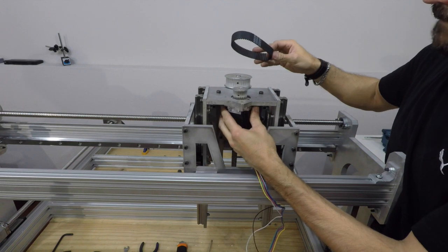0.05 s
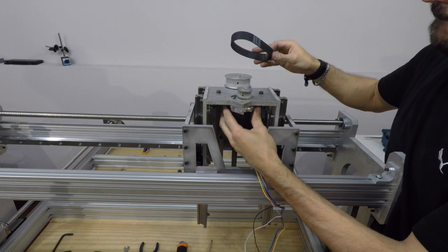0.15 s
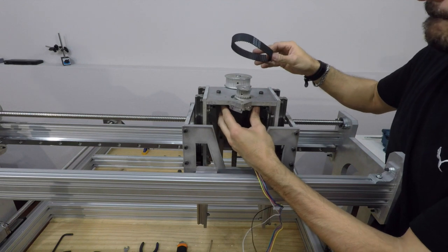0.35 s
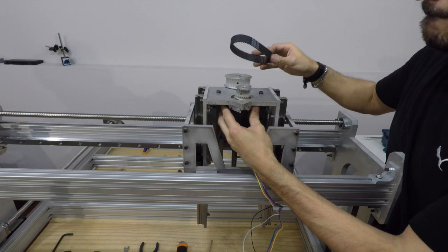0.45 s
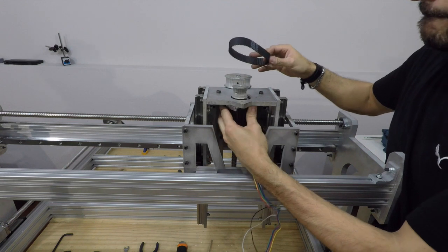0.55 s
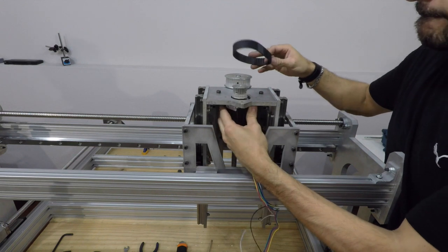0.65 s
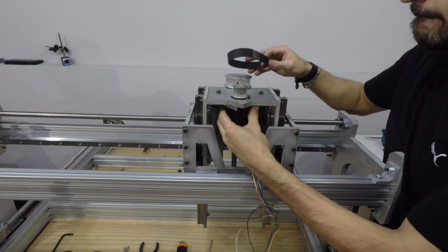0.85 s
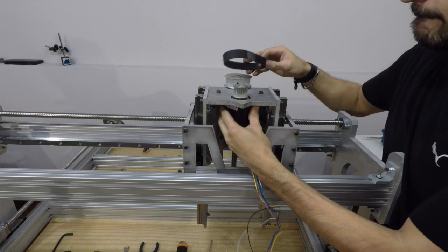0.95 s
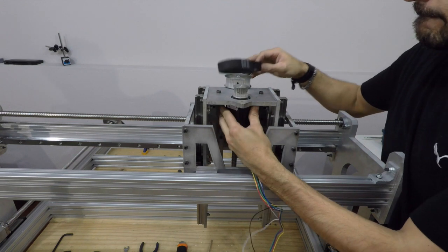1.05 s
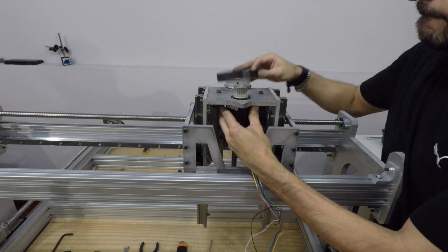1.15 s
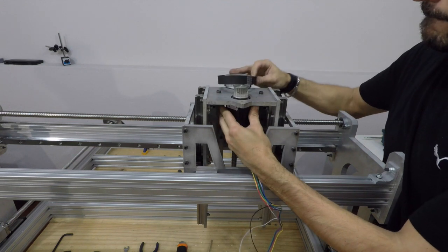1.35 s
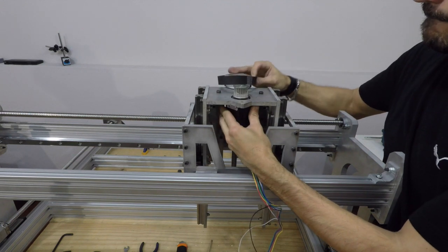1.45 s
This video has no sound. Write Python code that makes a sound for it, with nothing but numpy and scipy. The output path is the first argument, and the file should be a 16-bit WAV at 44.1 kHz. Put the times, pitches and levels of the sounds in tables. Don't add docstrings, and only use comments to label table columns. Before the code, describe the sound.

Metal frame knocked five times about a fifth of a second apart, each clank quickly damped, with low bench thuds, tiny ticks and faint belt rubs at the end; close microphone, reverberant room, low rumble.

```python
import sys
import numpy as np
from scipy import signal
from scipy.fft import rfft, irfft, next_fast_len
from scipy.io import wavfile
from scipy.ndimage import map_coordinates

SR = 44100
rng = np.random.default_rng(int(sys.argv[2]) if len(sys.argv) > 2 else 0)


def natural_amplitude(level_db):
    exponent = np.asarray(level_db, float) / 20
    return 10 ** exponent


def inscribe(sig):
    pcm = np.round(np.clip(np.atleast_2d(sig).T, -1, 1) * 32767)
    wavfile.write(sys.argv[1], SR, pcm.astype(np.int16))


N = 66150
T = np.arange(int(0.7 * SR)) / SR
ROOM_BUILD_S = 0.013
BENCH_WAVER_RATE = 18.9


def unit(x):
    return x / np.sqrt(np.mean(x ** 2) + 1e-20)


def along(points, hz):
    f, v = np.transpose(points)
    return np.interp(np.log(hz + 1), np.log(f + 1), v)


def coloured(spectrum, count):
    m = next_fast_len(count + 8192)
    gain = natural_amplitude(along(spectrum, np.fft.rfftfreq(m, 1 / SR)))
    return unit(irfft(rfft(rng.standard_normal(m)) * gain, m)[:count])


def waver(depth, rate):
    return depth * map_coordinates(rng.standard_normal(200), [T * np.clip(rate, 1, 250)])


def onset(attack_s):
    return 1 - np.exp(-T / attack_s)


def add(x, s, sound):
    part = x[round(s * SR):][:len(sound)]
    part += sound[:len(part)]


# (frequency [Hz], t60 [s])
ROOM = [(100, 0.76), (400, 0.44), (1200, 0.48), (3000, 0.48), (8000, 0.19)]


def reverberant(x):
    hz, t, z = signal.stft(x, SR, nperseg=256)
    decay = natural_amplitude(-60 * t / along(ROOM, hz)[:, None])
    shape = (1 - np.exp(-t / ROOM_BUILD_S)) * decay
    return signal.istft(z * shape, SR, nperseg=256)[1][:len(x)]


# (frequency [Hz], density [dB per Hz])
CRACK = [(500, -57), (1100, 8.5), (2000, -4), (4500, -11), (6000, -20), (15000, -57)]


def ring(modes, crack_db, free_s, damped_s, softness=1):
    tones = 0
    for hz, t60, db in modes:
        phase = 2 * np.pi * (hz * T + rng.random()) + waver(1.3, hz / 18)
        tones = tones + natural_amplitude(db - 60 * T / t60) * np.sin(phase)
    damping = natural_amplitude(-60 * np.maximum(T - free_s, 0) / damped_s)
    crack = natural_amplitude(crack_db - 60 * T / 0.051) * coloured(CRACK, len(T))
    return (tones * damping + crack) * onset(softness * 0.00077)


def boom(modes, swell_s, hold_s):
    t = np.maximum(T - 0.00591, 0)
    out = 0
    for hz, t60, db in modes:
        phase = 2 * np.pi * (hz * t + rng.random()) + waver(1, BENCH_WAVER_RATE)
        out = out + natural_amplitude(db - 60 * np.maximum(t - hold_s, 0) / t60) * np.sin(phase)
    return out * (1 - np.exp(-t / swell_s))


# (time [s], ring level [dB], room level [dB], boom level [dB], boom swell [s])
KNOCKS = [
    (0.1656, -21.5, -34.5, -37, 0.0074),
    (0.3546, -32, -37.5, -39.5, 0.0074),
    (0.5606, -33, -36.5, -36.5, 0.031),
    (0.7844, -38.5, -42.5, -42, 0.0047),
    (1.0146, -32, -38, -42, 0.0075),
]
# (crack over ring [dB], time until damped [s], damping t60 [s], boom hold [s])
CONTACTS = [
    (-21, 0.014, 0.034, 0.063),
    (-7, 0.0091, 0.21, 0.062),
    (-3.5, 0.0095, 0.097, 0.062),
    (-2, .01, 0.11, 0.034),
    (0.5, 0.0062, 0.32, 0.026),
]
SOFTNESS = 1.4, 1.2, 0.87, 0.77, 2.75
WET_DB = 1.5, -2, 2.5, -2.5, -4.5
# (time [s], knock number from 0 [1], level over that knock [dB])
REBOUNDS = [
    (0.586, 2, 0),
]
# (frequency [Hz], t60 [s], level [dB])
RING_1 = [(1491, 0.095, -3), (1630, 0.12, -7.5), (2028, 0.085, -12), (2240, 0.45, -28), (3054, 0.17, -27),
          (3830, 0.083, -17), (4920, 0.034, -18), (5020, 0.043, -16), (7300, 0.037, -27), (9650, 0.05, -32)]
RING_2 = [(1245, 0.11, -0.5), (1467, 0.37, -5), (1973, 0.09, -3), (2720, 0.054, -20), (3320, 0.053, -10.5),
          (3890, 0.053, -11), (5120, 0.056, -8.5), (8100, 0.039, -23)]
RING_3 = [(1206, 0.13, -3.5), (1538, 0.44, -8), (1613, 0.063, 1), (1990, 0.11, -7.5), (2790, 0.05, -6.5),
          (2920, 0.12, -7.5), (3270, 0.3, -13.5), (3850, 0.018, -3), (5090, 0.12, -14), (6830, 0.036, -21),
          (14800, 0.12, -36)]
RING_4 = [(1016, 0.12, 2.5), (1337, 0.056, -3.5), (1603, 0.059, -0.5), (1970, 0.095, -5), (2765, 0.064, -7),
          (768, 0.088, -8)]
RING_5 = [(890, 0.11, -9), (1114, 0.66, 1.5), (1250, 0.22, -7.5), (1268, 0.52, -3), (1460, 0.078, -7.5),
          (2071, 0.069, 5), (2586, 0.059, -13.5), (5300, 0.049, -20)]
# (frequency [Hz], t60 [s], level
# [dB])
BOOM_1 = [(32.7, 1, -2.5), (72.6, 0.31, 10.5), (109.1, 0.59, 8.5), (144.4, 0.26, 0.5), (241.3, 0.23, 1.5),
          (280.6, 0.15, 5), (411.3, 0.36, 2.5), (505, 0.21, 0.5)]
BOOM_2 = [(31.4, 1, -1), (70.8, 0.73, 2.5), (106.8, 0.25, 3), (152.4, 0.35, -5.5), (253.5, 0.44, 2.5),
          (347, 0.6, -4.5), (403.7, 0.17, -0.5), (489, 0.19, -4)]
BOOM_3 = [(66.2, 0.38, -6), (107.3, 0.37, 2.5), (141.8, 0.38, -2), (261, 0.26, 3), (329.6, 0.35, -2),
          (425, 0.8, -9.5), (521.5, 0.079, 4.5), (583, 0.077, -2), (691, 0.064, -3.5), (1864, 0.53, -9.5),
          (1990, 0.48, -13)]
BOOM_4 = [(68.9, 0.52, 1), (264.4, 0.44, -16), (362, 0.66, -7), (400.2, 0.27, 0), (453, 0.14, 2),
          (516, 0.075, -1), (544, 0.12, -5.5)]
BOOM_5 = [(73.4, 0.6, -1), (115.3, 0.4, 0), (255, 0.61, -3), (320.4, 0.18, 4), (423, 0.21, 2),
          (456, 0.18, 3), (519.4, 0.21, 5), (573, 0.2, 2.5), (676, 0.071, 1.5), (764, 0.17, -7)]
# (frequency [Hz], density [dB per Hz])
CLATTER_1 = [(150, -29), (250, 0), (750, -11.5), (1500, -9), (2300, -15.5), (2800, -22.5), (5500, -33.5),
             (14000, -53)]
CLATTER_2 = [(150, -44), (250, -0.5), (700, -6), (1300, -10.5), (2100, -21), (3300, -26.5), (5500, -36),
             (14000, -50)]
CLATTER_3 = [(150, -12), (250, -1), (700, -1), (1300, -6.5), (2100, -17), (3300, -19.5), (5500, -26.5),
             (14000, -53)]
CLATTER_4 = [(150, -23), (300, 2.5), (700, -8), (1300, -7), (2100, -41), (3300, -30), (5500, -48),
             (14000, -81)]
CLATTER_5 = [(150, -30), (300, 0.5), (700, -3), (1300, -3), (2300, -24), (3700, -24), (5000, -38),
             (14000, -90)]


def knocks():
    out = np.zeros(N)
    rings = RING_1, RING_2, RING_3, RING_4, RING_5
    booms = BOOM_1, BOOM_2, BOOM_3, BOOM_4, BOOM_5
    clatters = CLATTER_1, CLATTER_2, CLATTER_3, CLATTER_4, CLATTER_5
    for k, (s, ring_db, room_db, boom_db, swell_s) in enumerate(KNOCKS):
        *contact, hold_s = CONTACTS[k]
        direct = ring(rings[k], *contact, SOFTNESS[k])
        tail = reverberant(rng.standard_normal(len(T)))
        echo = signal.fftconvolve(direct, tail / np.linalg.norm(tail))[:len(T)]
        add(out, s, natural_amplitude(ring_db) * (direct + natural_amplitude(-7 + WET_DB[k]) * echo))
        add(out, s, natural_amplitude(boom_db) * boom(booms[k], swell_s, hold_s))
        add(out, s, natural_amplitude(room_db + 6) * reverberant(coloured(clatters[k], len(T))))
    for s, number, db in REBOUNDS:
        k = round(number)
        crack_db = -23
        add(out, s, natural_amplitude(KNOCKS[k][1] + db) * ring(rings[k], crack_db, *CONTACTS[k][1:3]))
    return out


# (frequency [Hz], t60 [s], level [dB])
RATTLE = [(1440, 0.074, -47), (2300, 0.049, -14), (3710, 0.057, 1.5), (4300, .04, -3.5), (4700, 0.028, -12),
          (7100, 0.043, -21), (9400, 0.051, -22)]


def rattle():
    out = np.zeros(N)
    direct = natural_amplitude(-36) * ring(RATTLE, crack_db=-2, free_s=0.012, damped_s=0.03)
    room = natural_amplitude(-27.5) * reverberant(coloured(CLATTER_2, len(T)))
    add(out, 0.2055, direct + room)
    return out


# (time [s], ..)
TICK_S = [
    (.168, .175, .176, .177, .199, .2045, .207, .212, .215, .222, .226, .226, .232, .252, .262),
    (.356, .358, .374, .376, .378, .398, .438, .53),
    (.5625, .5625, .563, .5625, .572, .583, .593, .604, .621, .634),
    (.785, .787, .798, .806, .824),
    (1.021, 1.028, 1.048, 1.054, 1.061, 1.068, 1.072, 1.098, 1.105, 1.117, 1.138, 1.241),
]
# (frequency [Hz], t60 [s], level [dB])
TICKS = [
    [(2970, 0.2, -42), (152, 0.092, -27.5), (263, 0.067, -30), (107, 0.075, -29.5), (1825.2, .03, -37),
     (3990, 0.032, -38), (1270, 0.032, -37), (857, 0.06, -30), (3530, .02, -38), (1010, 0.034, -36),
     (1495, 0.035, -36), (305, 0.056, -36), (2370, 0.033, -35), (1513, 0.062, -35), (1090, 0.037, -41)],
    [(1157, 0.055, -38), (3030, .05, -46), (3060, 0.036, -48), (2020, 0.065, -36), (1280, 0.035, -42),
     (438, .05, -35), (3200, 0.066, -53), (444, 0.12, -42)],
    [(3100, .025, -37), (3940, 0.029, -33), (2700, .025, -35), (1600, .03, -32), (3060, .08, -40.5),
     (1934, 0.086, -33.5), (2900, 0.021, -51), (630, .04, -37), (558, 0.072, -33), (333, .08, -37)],
    [(3900, 0.036, -46), (630, .04, -39), (1220, .03, -41), (437, 0.062, -36), (420, 0.054, -36)],
    [(614, 0.085, -32), (1150, 0.071, -24), (604, .05, -36), (2090, 0.043, -38), (464, 0.056, -34),
     (1200, 0.055, -34), (2020, 0.046, -37), (1290, .1, -38), (194, 0.059, -45), (2020, .04, -45),
     (1267, 0.049, -44), (1230, 0.11, -51)],
]


def ticks():
    out = np.zeros(N)
    for times, modes in zip(TICK_S, TICKS):
        for s, (hz, t60, db) in zip(times, modes):
            add(out, s, natural_amplitude(db - 60 * T / t60) * np.sin(2 * np.pi * hz * T) * onset(0.0011))
    return out


# (knock number from 0 [1], frequency [Hz], t60 [s], level [dB])
LINGER = [(4, 1500, 0.49, -47), (4, 1300, 0.61, -42), (4, 1200, .55, -41), (4, 1700, .7, -54.5),
          (4, 790, 0.35, -45), (0, 2326, 0.48, -40.5), (0, 2213, .33, -55), (0, 1077, 0.55, -43),
          (4, 1400, 0.26, -48)]


def lingering():
    out = np.zeros(N)
    for k, hz, t60, db in LINGER:
        flutter_db = waver(4.5, 25.6)
        level = natural_amplitude(db - 60 * T / t60 + flutter_db) * onset(ROOM_BUILD_S)
        phase = 2 * np.pi * hz * T + waver(0.36, BENCH_WAVER_RATE)
        add(out, KNOCKS[round(k)][0], level * np.sin(phase))
    return out


GRIT_S = .1655, .2055, .5605
# (length [s], level [dB])
GRITS = [
    (0.0096, -45),
    (0.0072, -51.5),
    (0.029, -56),
]
# (frequency [Hz], density [dB per Hz])
GRIT = [(1800, -42), (3000, 2.5), (4200, -4), (5600, 0), (6500, -21), (10000, -17.5), (15000, -32)]


def grit():
    out = np.zeros(N)
    for s, (length, db) in zip(GRIT_S, GRITS):
        shape = onset(0.00084) * natural_amplitude(-60 * np.maximum(T - length, 0) / 0.037)
        add(out, s, natural_amplitude(db) * shape * coloured(GRIT, len(T)))
    return out


# (frequency [Hz], t60 [s], level [dB])
ROCK = [
    (27, 0.56, -47),
    (68.9, 0.57, -39.5),
]


def bench_rock():
    out = np.zeros(N)
    add(out, 0.69, boom(ROCK, swell_s=0.014, hold_s=0.032))
    return out


RUB_S = 1.239, 1.252, 1.471, 1.265, .994, 1.24
# (length [s], level [dB], centre frequency [Hz])
RUBS = [
    (.008, -63.5, 4300),
    (0.016, -72, 3900),
    (.03, -66, 4600),
    (.05, -54.5, 313),
    (0.013, -58.5, 1780),
    (.06, -57.5, 676),
]


def rubs():
    out = np.zeros(N)
    for s, (length, db, hz) in zip(RUB_S, RUBS):
        band = [(hz / 3, -40), (hz * 0.75, -5), (hz, 0), (hz * 1.3, -5), (hz * 2.2, -40), (hz * 4, -90)]
        shape = onset(0.0011) * natural_amplitude(-30 * np.maximum(T - length, 0) / 0.12)
        add(out, s, natural_amplitude(db) * shape * coloured(band, len(T)))
    return out


# (frequency [Hz], density [dB per Hz])
FADING = [(30, 0), (90, -14), (180, -3), (280, 7.5), (440, -4), (600, -9), (2000, -29)]


def fading():
    out = np.zeros(N)
    add(out, 0, natural_amplitude(-52.5 - 60 * T / 0.48) * coloured(FADING, len(T)))
    return out


# (frequency [Hz], density [dB per Hz])
TONE = [(15, 1), (42, 0.5), (130, -3), (190, -10.5), (420, -19), (700, -24), (4500, -34.5), (15200, -45.5)]


def room_tone():
    return natural_amplitude(-49.5) * coloured(TONE, N)


def scene():
    struck = knocks() + rattle() + ticks() + lingering() + grit()
    behind = bench_rock() + rubs() + fading() + room_tone()
    return (struck + behind)[None]


def roll_off(x):
    return signal.sosfilt(signal.butter(12, 15260, fs=SR, output="sos"), x)


def record(dry):
    in_band = np.fft.rfftfreq(N, 1 / SR) < 15260
    limited = irfft(rfft(dry) * in_band, N)
    return roll_off(limited)


dry = scene()
out = record(dry)
inscribe(out)
```